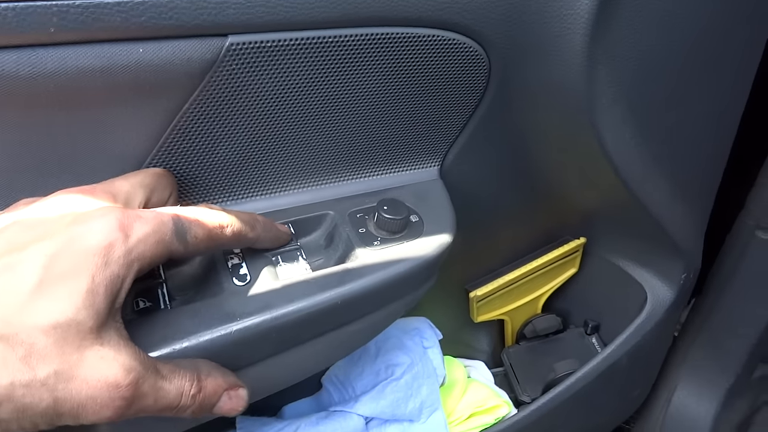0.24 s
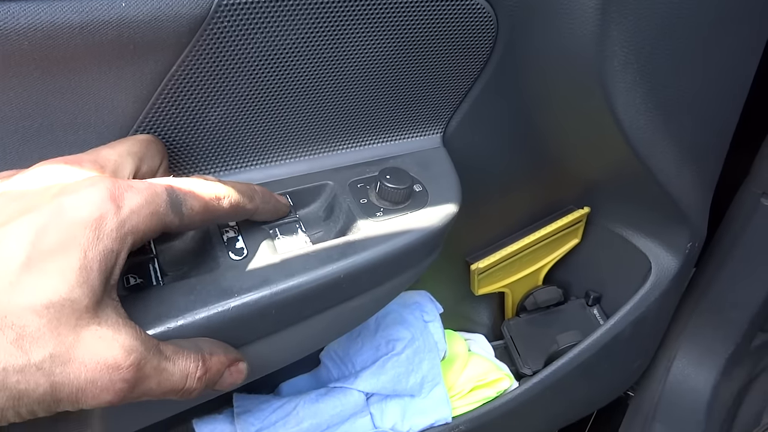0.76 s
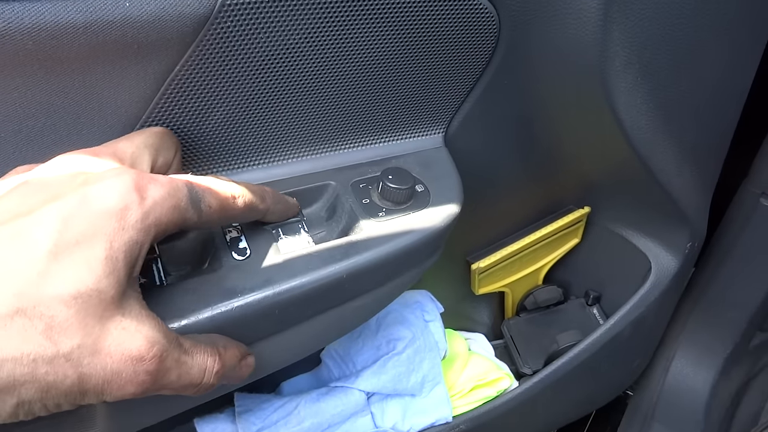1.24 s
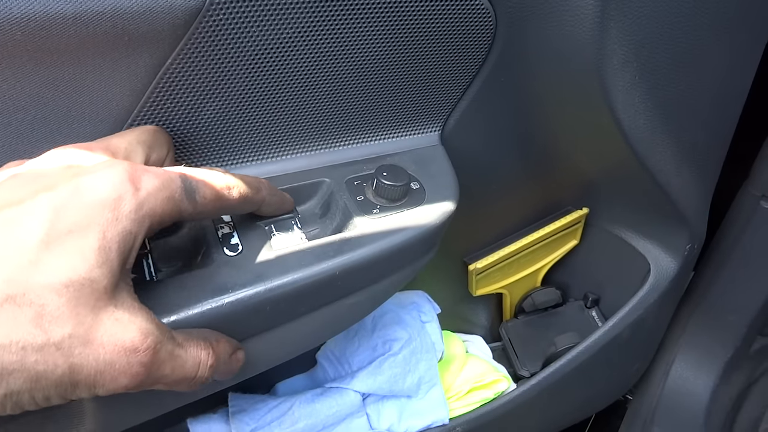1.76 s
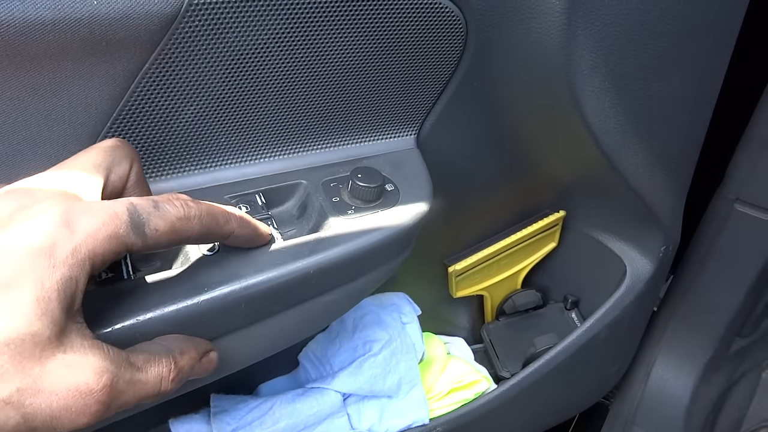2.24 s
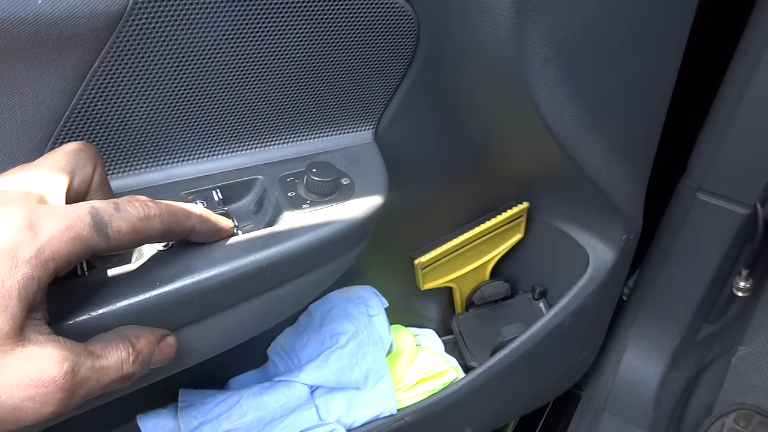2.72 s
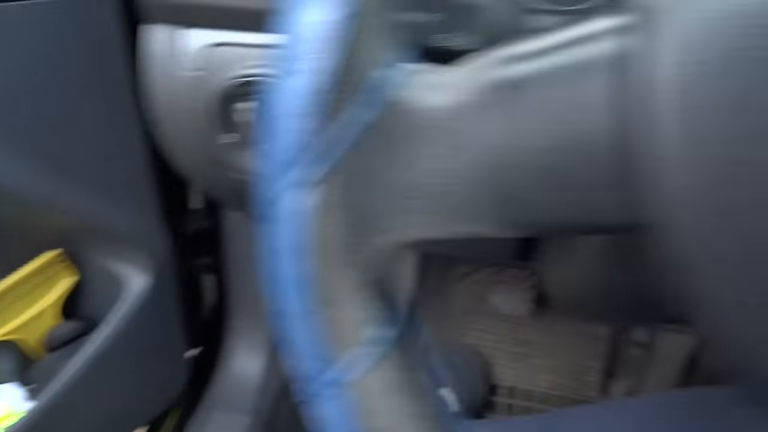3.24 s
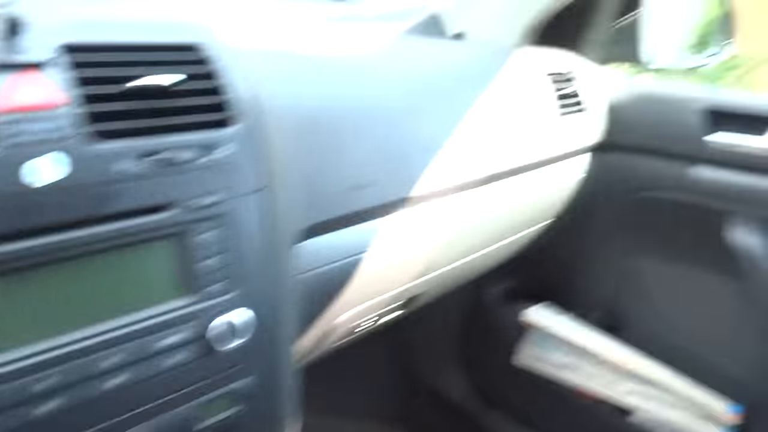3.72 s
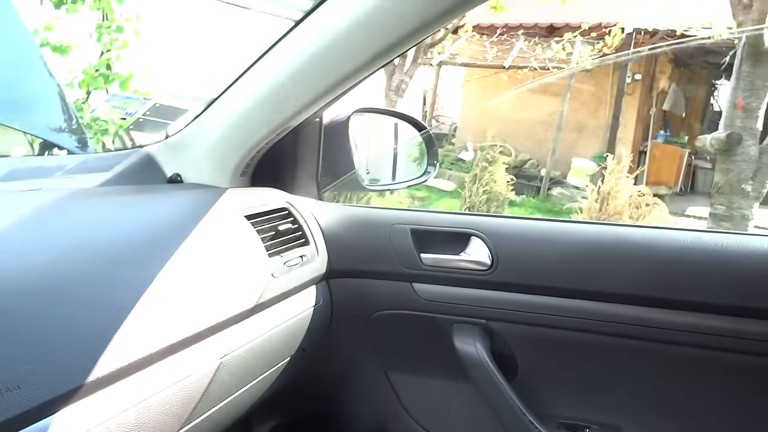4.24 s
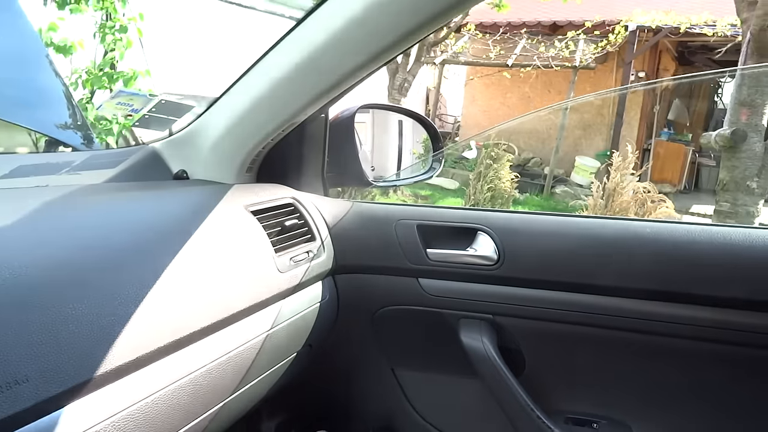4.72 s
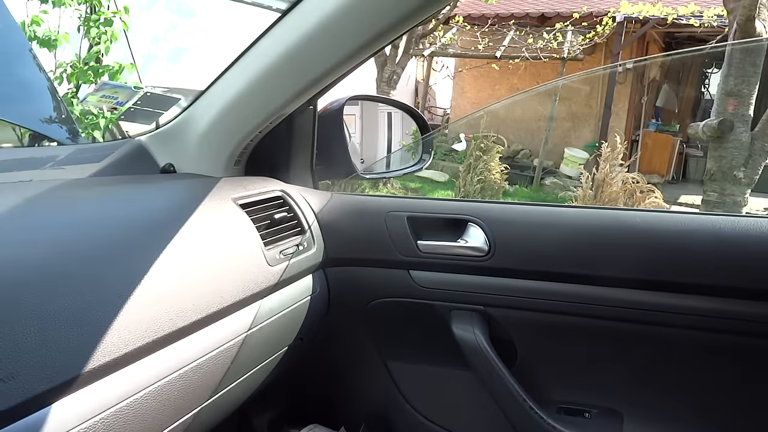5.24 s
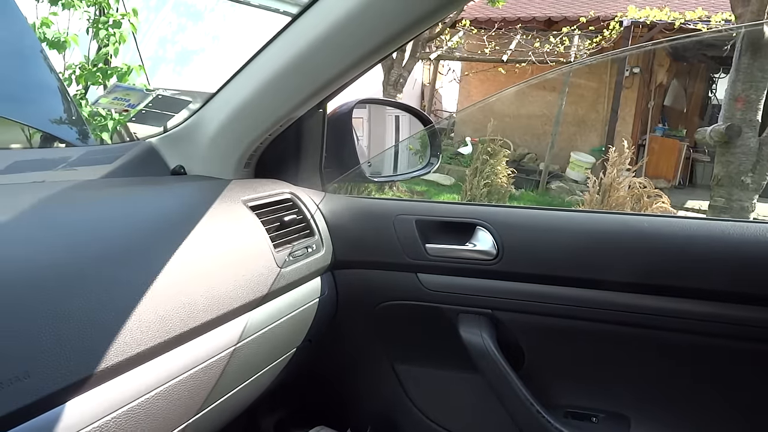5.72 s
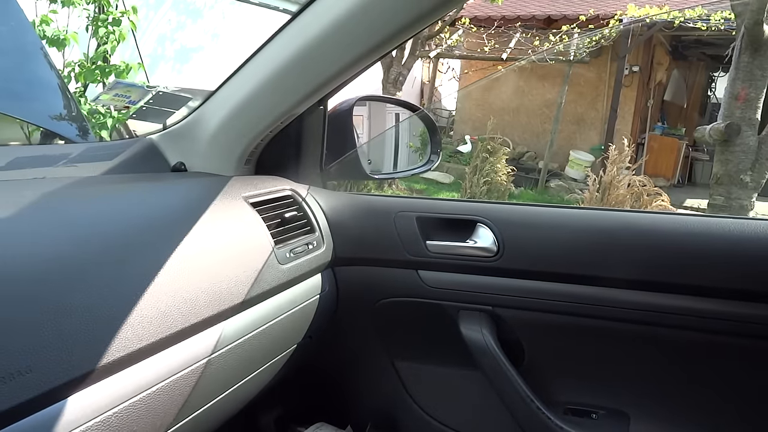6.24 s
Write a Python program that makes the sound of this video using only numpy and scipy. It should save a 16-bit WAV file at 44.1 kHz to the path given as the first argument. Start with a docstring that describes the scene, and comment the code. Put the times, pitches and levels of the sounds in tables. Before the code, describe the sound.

In a quiet parked car, plastic switches tick, a window motor hums for two seconds, clunks to a stop, then runs twice more briefly.

```python
"""Inside a small, quiet parked car a finger feels over the door switches, then runs the far power window: down, up, up.
Touches, clicks and knocks ring modes of the door, with noise bursts for the hard parts; skin hisses over plastic.
The motor sums multiples of its shaft speed, racing until the slack is taken up; its last run lasts to the end.
The glass rubs as uneven filtered noise with small catches and chirps, and slow rocking follows starts and stops.
Cabin air, low shudder and the hand on the trim lie beneath; two close microphone ports hear it all."""
import sys
import numpy as np
from scipy import signal
from scipy.fft import rfft, irfft, next_fast_len
from scipy.io import wavfile
from scipy.ndimage import uniform_filter1d, map_coordinates

SR = 44100
rng = np.random.default_rng(int(sys.argv[2]) if len(sys.argv) > 2 else 0)


def store_pcm(level_fs):
    """Save levels as 16-bit WAV."""
    pcm = np.round(np.clip(level_fs, -1, 1) * 32767).astype(np.int16)
    wavfile.write(sys.argv[1], SR, np.atleast_2d(pcm).T)


N = 285327
TIME = np.arange(N) / SR


def amp(db):
    """Decibels to gain."""
    return 10 ** (np.asarray(db) / 20)


def unit(x):
    """Scales to rms 1."""
    return x / np.sqrt(np.mean(x ** 2) + 1e-20)


def read(points, hz):
    """A spectrum table joined on a log-frequency axis."""
    table_hz, value = np.transpose(points)
    return np.interp(np.log(hz + 1), np.log(table_hz + 1), value)


def curves(rows, t):
    """Every column of a curve table at the times t."""
    knot_s, *columns = np.transpose(rows)
    return [np.interp(t, knot_s, column) for column in columns]


def add(mix, start_s, sound):
    """Mixes a sound in at start_s."""
    part = mix[max(round(start_s * SR), 0):][:len(sound)]
    part += sound[:len(part)]


def colour(x, points):
    """Filters by a spectrum table."""
    size = next_fast_len(len(x))
    gain = amp(read(points, np.fft.rfftfreq(size, 1 / SR)))
    return irfft(rfft(x, size) * gain, size)[:len(x)]


def noise(points, size):
    """Coloured noise of rms 1."""
    return unit(colour(rng.standard_normal(size), points))


def band(x, lo_hz, hi_hz):
    """The part of x between two frequencies."""
    edges_hz = [lo_hz, min(hi_hz, SR / 2 - 1)]
    return signal.sosfilt(signal.butter(3, edges_hz, "band", fs=SR, output="sos"), x)


def wander(knots_per_s, t):
    """Smooth random curve of rms near 1 through evenly spaced random knots."""
    knots = rng.standard_normal(int((t[-1] - t[0]) * knots_per_s) + 4)
    return map_coordinates(knots, [(t - t[0]) * knots_per_s + 1], order=3, mode="nearest")


def gate(t, fade_s):
    """Soft start and stop of a run; a run that lasts to the end stays on."""
    stop = t[-1] + (t[-1] > TIME[-1] - fade_s)
    return np.clip(np.minimum(t - t[0], stop - t) / fade_s, 0, 1)


def swell(u):
    """Rises to 1 at u = 1, then fades."""
    u = np.maximum(u, 0)
    return u * np.exp(1 - u)


def catching(size, grains_per_s, grain_size):
    """White noise with random single-sample catches that stand out from it."""
    catches = (rng.random(size) < grains_per_s / SR) * grain_size * rng.random(size)
    return rng.standard_normal(size) * (1 + catches)


def reflect(x, share=0.42, decay_s=0.005):
    """Echoes from nearby glass and trim ripple the spectrum."""
    t = np.arange(SR // 40) / SR
    echoes = rng.standard_normal(len(t)) * np.exp(-t / decay_s) * (t > .0004)
    return x + share * signal.fftconvolve(x, echoes / np.linalg.norm(echoes))[:len(x)]


# cabin air spectrum: hz [Hz], density_db [dB per Hz]
AIR_SPECTRUM = [(12, -58), (20, -10), (177, -0.5), (377, -7), (825, -8.5), (1000, -7.5), (1610, -14),
                (1760, -12.5), (5080, -23), (5850, -20.5), (14700, -29.5), (16000, -28.5)]
AIR_DB = -60


def cabin_air():
    """Steady coloured noise of the quiet cabin."""
    return amp(AIR_DB) * noise(AIR_SPECTRUM, N)


# low shudder spectrum: hz [Hz], density_db [dB per Hz]
SHUDDER_SPECTRUM = [(15,-4),(30,-9.5),(55,0),(90,-2.5),(150,-4.5),(300,-14),(900,-51)]
# swells of the shudder: start_s [s], level_db [dB], peak_s [s to the peak]
SHUDDERS = [(0.0, -66, .03), (1.0, -57.5, 0.095), (1.33, -73, .2), (1.89, -45.5, 0.039), (2.6, -38, 0.086),
            (2.8, -31, 0.033), (2.9, -50, 0.18), (3.38, -49, 0.15), (4.76, -46.5, 0.099), (5.22, -52, 0.11),
            (5.6, -42, 0.067), (6.04, -56, 0.12)]
SHUDDER_FLOOR_DB, SHUDDER_RUNNING_DB = -85, -58.5  # at rest; while the motor runs


def shudder():
    """Low noise of the shaken door and hand: a steady part and separate swells add in power."""
    running = sum((TIME > run[0]) & (TIME < run[2]) for run in RUNS)
    steady = amp(np.where(running, SHUDDER_RUNNING_DB, SHUDDER_FLOOR_DB))
    swells = sum((amp(level_db) * swell((TIME - start_s) / peak_s)) ** 2
                 for start_s, level_db, peak_s in SHUDDERS)
    return np.sqrt(steady ** 2 + swells) * noise(SHUDDER_SPECTRUM, N)


# spectra of the hand on trim, dull rub and bright rustle: hz [Hz], density_db [dB per Hz]
HAND_RUB_SPECTRUM = [(50,-10),(100,-3.5),(240,-2),(450,-17),(1000,-8),(3000,-51)]
HAND_RUSTLE_SPECTRUM = [(150, -13), (250, 8.5), (336, -23), (380, 3.5), (452, -11.5), (831, -6.5),
                        (2050, -10.5), (2360, -5), (4120, -19), (9830, -25), (16000, -28)]
# strokes of the hand: middle_s [s], half_s [s, to 1/e], rub_db [dB], rustle_db [dB]
STROKES = [(0.019, 0.044, -47, -49.5), (0.123, 0.074, -48.5, -57), (0.364, 0.13, -81, -61.5),
           (1.137, 0.1, -61, -64), (1.7, 0.058, -55, -80), (2.025, 0.11, -62.5, -70),
           (2.425, 0.06, -57, -65), (2.6, 0.03, -59, -55)]


def hand_on_trim():
    """Skin catches on grained trim: rub and rustle noise under unsteady bell-shaped strokes."""
    rustle = unit(reflect(colour(catching(N, grains_per_s=300, grain_size=5), HAND_RUSTLE_SPECTRUM)))
    rub = noise(HAND_RUB_SPECTRUM, N)
    hand = np.zeros(N)
    for middle_s, half_s, rub_db, rustle_db in STROKES:
        stroke = np.exp(-((TIME - middle_s) / half_s) ** 2)
        hand += stroke * (amp(rub_db) * rub + amp(rustle_db) * rustle)
    return hand * np.exp(0.35 * wander(44, TIME))


# skids of a fingertip: start_s [s], level_db [dB], peak_s [s to the peak]
SKIDS = [(.012,-51,0.0095),(1.924,-55,0.041)]
# resonances of a skid: centre_hz [Hz], width_hz [Hz], level_db [dB, relative]
SKID_RING = [(2270,240,3.5),(3080,290,-0.5),(5700,1300,-3),(9420,1200,4),(15000,900,-8)]


def skid(start_s, level_db, peak_s):
    """Skin hisses over plastic in a few bright resonances, swelling and fading."""
    t = np.arange(SR // 3) / SR
    ring = 0
    for hz, width_hz, ring_db in SKID_RING:
        resonance = band(rng.standard_normal(len(t)), hz - width_hz / 2, hz + width_hz / 2)
        ring = ring + amp(ring_db) * unit(resonance)
    return start_s, amp(level_db) * unit(ring) * swell(t / peak_s)


# modes of the door: hz [Hz], level_db [dB, relative], t60_s [s]
DOOR_MODES = [(82.3,-8,0.3),(120.7,-2,0.26),(147.3,3.5,0.12),(181.3,3,0.079),(224.3,3.5,0.11),(283.4,4,0.072),(351.2,-1,0.11),(399,-1,0.08),(484,2,0.046),(598,5,0.043),(660.4,3.5,0.052),(715,-2.5,0.034),(769,-3,0.063),(890,7.5,0.022),(1125,-2.5,0.065)]
# spectra of hard plastic and steel parts: hz [Hz], density_db [dB per Hz]
CLACK_SPECTRUM = [(400,-28),(900,0),(1400,6),(2100,1.5),(2900,-6),(3800,-7.5),(5500,-18),(9000,-58)]
TICK_SPECTRUM = [(2000,-10),(4000,-0.5),(6200,5.5),(7800,-1),(10000,3),(13000,-6),(16000,-12)]


def blow(row, rise_s, trim_db, rattle, tail_db, tail_s, focus_octaves=0.69):
    """A push and a brief rattle ring the door modes, while the hard parts clack and tick."""
    start_s, ring_db, ring_hz, thud_db, clack_db, tick_db, length_s = row
    t = np.arange(SR // 4) / SR
    decay = np.exp(-t / max(length_s, .001)) + amp(tail_db) * np.exp(-t / tail_s)
    contact = (1 - np.exp(-t / rise_s)) * decay
    chatter = contact * rng.standard_normal(len(t))
    force = rattle * chatter / np.linalg.norm(chatter) + (t == 0)

    hz, mode_db, t60_s = np.transpose(DOOR_MODES)[:, :, None]
    modes = amp(mode_db - 60 * t / t60_s) * np.sin(2 * np.pi * hz * t) * rng.choice([-1, 1], hz.shape)
    near = 1 / (1 + (np.log2(hz / ring_hz) / focus_octaves) ** 2)  # the spot that is hit favours some modes
    panel = signal.fftconvolve(force, (modes * near * (hz > 260)).sum(0))[:len(t)]
    panel *= 1 - np.exp(-t / 0.0018)
    shell = signal.fftconvolve(force, (modes * (hz < 260)).sum(0))[:len(t)]
    shell *= 1 - np.exp(-t / 0.0092)
    clack = reflect(contact * noise(CLACK_SPECTRUM, len(t)))
    tick = reflect(contact * noise(TICK_SPECTRUM, len(t)))

    out = np.zeros(len(t))
    levels_db = [ring_db, thud_db, clack_db, tick_db]
    for level_db, part_trim_db, part in zip(levels_db, trim_db, [panel, shell, clack, tick]):
        loudest = np.sqrt(uniform_filter1d(part ** 2, size=512, mode="constant").max())
        out += amp(level_db + part_trim_db) * part / loudest
    return start_s, out


# soft finger touches, levels before trim_db: start_s [s], ring_db [dB], ring_hz [Hz, centre],
# thud_db [dB], clack_db [dB], length_s [s]
TOUCHES = [(0.892, -38.5, 270, -52, -62, .007), (0.932, -44, 281, -46, -55.5, 0.0066),
           (1.127, -42, 700, -53, -49, 0.0038), (1.156, -54, 500, -54, -53.5, .004),
           (1.327, -49, 288, -52, -52.5, 0.018), (1.374, -39.5, 283, -47.5, -52, 0.025),
           (1.4, -36.5, 653, -42.5, -47, 0.0048), (1.417, -38.5, 804, -42.5, -55, 0.0046),
           (1.673, -34.5, 280, -32.5, -41.5, 0.0063), (1.738, -38, 620, -44, -46.5, 0.0031),
           (1.884, -38.5, 280, -42.5, -60, 0.0071), (1.906, -43, 864, -50, -48, 0.013),
           (1.928, -28, 755, -43.5, -41.5, .0045), (2.36, -45, 250, -43, -59, 0.0082),
           (2.491, -42, 385, -41, -47, 0.0076), (2.551, -46, 480, -36.5, -45, .0028),
           (4.98, -28, 316, -36.5, -40, 0.0025), (5.915, -37.5, 283, -46, -46.5, 0.0086),
           (5.943, -29.5, 385, -51, -38, 0.0074), (5.996, -35.5, 388, -51, -52.5, 0.0049)]
TOUCH_TICK_DB = -22  # tick against clack, before trim_db


def finger_touches(mix):
    """Soft blows of a fingertip on the switch panel."""
    for start_s, ring_db, ring_hz, thud_db, clack_db, length_s in TOUCHES:
        row = start_s, ring_db, ring_hz, thud_db, clack_db, clack_db + TOUCH_TICK_DB, length_s
        add(mix, *blow(row, rise_s=0.0021, trim_db=(-8, -2, -4, 3.5), rattle=0.51, tail_db=-22.5, tail_s=0.04))


# sharp switch clicks, levels before trim_db: start_s [s], ring_db [dB], ring_hz [Hz, centre],
# thud_db [dB], clack_db [dB], tick_db [dB], length_s [s]
CLICKS = [(0.13, -21, 1100, -43.5, -27, -47, 0.0018), (1.03, -40, 369, -40.5, -46, -45, 0.0028),
          (1.05, -55, 283, -49, -44.5, -56, 0.0018), (1.639, -32.5, 283, -44, -46, -52, 0.013),
          (2.393, -52, 1100, -63, -26, -39, 0.0021), (2.452, -37.5, 283, -45, -32.5, -53, 0.0012),
          (2.532, -56, 310, -58, -41, -38, 0.0013), (4.963, -32.5, 745, -43, -38.5, -48, 0.017),
          (5.003, -18, 316, -40, -27, -44.5, 0.0045), (5.93, -28.5, 394, -37.5, -40.5, -48.5, 0.01)]


def switch_clicks(mix):
    """Sharp blows of the switches on their panel."""
    for row in CLICKS:
        add(mix, *blow(row, rise_s=0.002, trim_db=(-13, -3.5, -8, -2.7), rattle=0.57, tail_db=-36, tail_s=0.017))


# knocks of the lifter and the glass, levels before trim_db: start_s [s], ring_db [dB],
# ring_hz [Hz, centre], thud_db [dB], clack_db [dB], tick_db [dB], length_s [s]
KNOCKS = [(2.604, -22, 640, -32.5, -35, -51, 0.0078), (2.634, -19.5, 380, -27.5, -39, -62, 0.0055),
          (2.647, -15.5, 372, -30.5, -37.5, -53, 0.008), (2.68, -29, 450, -36, -45, -53, 0.007),
          (2.709, -8, 646, -21, -41, -60, 0.0036), (2.815, -31, 284, -29, -31.5, -39.5, 0.0061),
          (2.829, -27, 514, -32, -57, -56, 0.007), (2.868, -39, 280, -37, -56, -73, 0.014),
          (2.922, -23, 930, -39, -40, -54, 0.0027), (2.995, -21.5, 406, -31, -32, -44, 0.0033),
          (3.242, -30.5, 310, -40, -48, -70, 0.0094), (4.626, -20.5, 290, -54, -53, -53, 0.0066),
          (4.653, -20, 497.5, -37, -54, -42, 0.0099), (4.772, -19.5, 302, -24.5, -50, -55, 0.012),
          (4.79, -24, 367, -30, -44.5, -44.5, 0.0054), (5.068, -42, 500, -46, -54, -50, 0.004),
          (5.076, -23, 330, -32.5, -43.5, -64, 0.0061), (5.128, -22, 333, -43, -39.5, -67, 0.0085),
          (5.14, -5.5, 554, -30, -44, -58, 0.023), (5.186, -8.5, 430, -26, -35, -64, 0.0069),
          (5.198, -10, 467, -26.5, -38, -53, 0.01), (5.489, -25, 453, -42, -46, -60, 0.01),
          (5.529, -26, 501, -42, -41, -37.5, 0.0047), (5.606, -21, 280, -22, -46, -62, 0.011),
          (6.028, -32, 636, -36, -49, -49, 0.0035), (6.042, -19.5, 566, -32, -42.5, -66, 0.0093)]


def door_knocks(mix):
    """Blows of the lifter and the glass inside the far door."""
    for row in KNOCKS:
        add(mix, *blow(row, rise_s=0.0016, trim_db=(-12, -3.5, 0, -5), rattle=0.34, tail_db=-19.5, tail_s=0.041))


# rocking when the glass starts or stops: start_s [s], level_db [dB, peak]
JOLTS = [(2.801, -41), (4.79, -55), (5.215, -40), (5.62, -44), (6.06, -42)]
ROCK_HZ, ROCK_PEAK_S = 30.9, 0.058


def jolt(start_s, level_db):
    """The car rocks on its springs for a few slow cycles."""
    t = np.arange(SR // 2) / SR
    return start_s, amp(level_db) * swell(t / ROCK_PEAK_S) * np.sin(2 * np.pi * ROCK_HZ * t)


# chirps of the catching seal: start_s [s], level_db [dB], pitch_hz [Hz], peak_s [s to the peak]
CHIRPS = [(3.885,-45,1099,0.013),(4.27,-58,3805,0.011),(4.301,-36,3900,0.002),(4.443,-42,4160,0.0053),(4.697,-42.5,4600,0.0065),(4.718,-44.5,3940,0.011),(5.495,-46,1980,0.021),(6.157,-39,3980,0.0025),(6.192,-51,6000,0.005)]


def chirp(start_s, level_db, pitch_hz, peak_s, half_width=0.065):
    """A brief stick and slip of the seal, narrow in pitch."""
    t = np.arange(SR // 6) / SR
    squeak = band(rng.standard_normal(len(t)), pitch_hz * (1 - half_width), pitch_hz * (1 + half_width))
    return start_s, amp(level_db) * unit(squeak) * swell(t / peak_s)


TURN_S = (3.6, 3.96)  # the microphone comes round to face the far door
AWAY_DB = {"hum": -2, "rub": -5, "hiss": -10, "drone": -4.5}  # change while it still faces away
# change while the glass is not yet moving
SLACK_DB = {"hum": -4.5, "whine": -4, "high tone": -14, "rub": -8, "hiss": -11.5, "drone": 5}


def away(t):
    """1 while the microphone faces the near door, 0 once it faces the far one."""
    return np.interp(t, TURN_S, [1, 0])


def slack(t, taken_up_s, ease_s):
    """1 while the lifter runs loose, 0 once it carries the glass."""
    return .5 - .5 * np.tanh((t - taken_up_s) / (2 * ease_s))


def patchy(x, depth_db=1.83):
    """The contact shifts from spot to spot, so narrow bands swell and fade."""
    z = signal.stft(x, nperseg=512)[2]
    patches = uniform_filter1d(rng.standard_normal(z.shape), size=5, axis=0)
    patches = uniform_filter1d(patches, size=6, axis=1)
    return signal.istft(z * amp(depth_db * unit(patches)), nperseg=512)[1][:len(x)]


# friction spectra of the glass going down and up: hz [Hz], density_db [dB per Hz]
SLIDE_DOWN = [(47, -44), (80, -26), (117, -21), (222, -23.5), (323, -26), (563, -19.5), (672, -21),
              (1250, -12.5), (1370, -16), (1490, -8), (1600, -11), (3240, -16), (7700, -29.5), (11000, -29),
              (16000, -40.5)]
SLIDE_UP = [(47, -34), (80, -1), (139, -7.5), (277, -5), (378, -6.5), (538, -4), (629, -5.5), (958, -17),
            (1250, -16.5), (1340, -10), (1460, -11), (2900, -16.5), (3790, -13), (11200, -19),
            (16000, -30.5)]
GRIP_S = 0.0045  # the glass breaks free of its seals almost at once


def slide(run, spectrum, grit=0.083):
    """Rubber rubs on glass: uneven friction noise with small catches, droning in the door below."""
    start_s, taken_up_s, stop_s, *_, rub_db, hiss_db, drone_db = run
    t = np.arange(start_s, stop_s, 1 / SR)
    loose = slack(t, taken_up_s, GRIP_S)
    rough = catching(len(t), grains_per_s=420, grain_size=4.3) * np.exp(grit * wander(130, t))
    friction = colour(patchy(rough), spectrum)
    # drone_db is the level within 250-570 Hz, rub_db within 2000-3500 Hz
    drone = band(friction, 128, 775) / np.std(band(friction, 250, 570))
    friction = reflect(friction)
    rub = band(friction, 650, 3640) / np.std(band(friction, 2000, 3500))
    hiss = unit(band(friction, 5270, SR / 2))
    out = 0
    for name, level_db, layer in [("drone", drone_db, drone), ("rub", rub_db, rub), ("hiss", hiss_db, hiss)]:
        out = out + amp(level_db + SLACK_DB[name] * loose + AWAY_DB[name] * away(t)) * layer
    return start_s, out * gate(t, 0.003)


# single tones change as the microphone moves about the cabin:
# middle_s [s], multiple [of shaft speed], change_db [dB], half_s [s, to 1/e]
SWELLS = [(3.25, 1, -6, .3), (3.5, 10, 23, .07), (3.5, 17, 16, .07), (3.535, 20, -10, .028),
          (3.62, 30, 7, .12), (3.7, 20, -6, .025), (4.24, 12, 9, .07), (4.5, 9, 8, .2)]
SLOTS = 10  # armature slots
FREE_HZ, SPIN_UP_S, TAKE_UP_S = 86.67, .021, 0.01635  # no-load speed; time constants of spin-up, loading
SPEED_POWER = 1.7  # how steeply the sound grows as the motor spins up
FLUTTER = .3  # hum flutter, approached by high multiples
BRUSH_HZ, BRUSH_HALF_WIDTH, BRUSH_DB = 7090, .05, -64.99  # half width as a share of the pitch


def motor(run, load, hum, jitter=0.002, loose_jitter=0.0223, whine_flutter=0.024, loose_flutter=0.5, throb=0.024):
    """Tones on multiples of shaft speed, slot tones throbbing once a turn, faint brush noise; races if unloaded."""
    start_s, taken_up_s, stop_s, hum_db, low_db, high_db = run[:6]
    t = np.arange(start_s, stop_s, 1 / SR)
    loose = slack(t, taken_up_s, TAKE_UP_S)
    loaded_hz, whine_db = curves(load, t)
    spun_up = 1 - np.exp(-(t - start_s) / SPIN_UP_S)
    shaft_hz = (loaded_hz + (FREE_HZ - loaded_hz) * loose) * spun_up
    uneven = 1 + (jitter + loose_jitter * loose) * wander(46.13, t)
    angle = 2 * np.pi * np.cumsum(shaft_hz * uneven) / SR
    turned_db = AWAY_DB["hum"] * away(t)

    def tone(k, rms_db):
        """Multiple k of the shaft speed, as it reaches the moving microphone."""
        swell_db = sum(change_db * np.exp(-((t - middle_s) / half_s) ** 2)
                       for middle_s, multiple, change_db, half_s in SWELLS if multiple == k)
        return np.sqrt(2) * amp(rms_db + swell_db) * np.cos(k * angle + 2 * np.pi * rng.random())

    hum_db = hum_db + turned_db + SLACK_DB["hum"] * loose
    out = 0
    for multiple, relative_db in hum:
        flutter = 1 + FLUTTER * multiple / (multiple + 2) * wander(31.76, t)
        out = out + tone(round(multiple), hum_db + relative_db) * flutter

    low_db = low_db + turned_db
    whine_db = whine_db + SLACK_DB["whine"] * loose
    high_db = high_db + turned_db + SLACK_DB["high tone"] * loose
    slots = sum(tone(k * SLOTS, level_db) for k, level_db in enumerate([low_db, whine_db, high_db], 1))
    flutter = 1 + (whine_flutter + loose_flutter * loose) * wander(59.47, t)
    out += slots * (1 + throb * np.cos(angle)) * flutter

    lo_hz, hi_hz = BRUSH_HZ * (1 - BRUSH_HALF_WIDTH), BRUSH_HZ * (1 + BRUSH_HALF_WIDTH)
    brushes = unit(band(rng.standard_normal(len(t)), lo_hz, hi_hz))
    out += amp(BRUSH_DB + AWAY_DB["hiss"] * away(t)) * brushes
    return start_s, out * spun_up ** SPEED_POWER * gate(t, 0.022)


# runs down, up and up again, levels before SLACK_DB and AWAY_DB: start_s [s], taken_up_s [s],
# stop_s [s], hum_db [dB], low_slot_db [dB], high_slot_db [dB], rub_db [dB], hiss_db [dB], drone_db [dB]
RUNS = [(2.597, 2.815, 4.776, -32.6, -59, -56.5, -46, -49.5, -49.5),
        (5.067, 5.211, 5.608, -43.5, -50.5, -64, -47, -52.5, -46.5),
        (6.023, 6.04, 6.47, -42.5, -42, -57, -49, -54.5, -51.5)]
# motor under load, a table a run: time_s [s], shaft_hz [Hz], whine_db [dB, before SLACK_DB]
DOWN_LOAD = [(2.9, 67.5, -42.5), (3.02, 70.02, -47.5), (3.28, 68.73, -47), (3.462, 70.06, -35.5),
             (3.6, 72.7, -37), (3.78, 74.5, -34), (4.24, 73.56, -35), (4.521, 74.48, -36.5),
             (4.76, 72.4, -34)]
UP_LOAD = [(5.23, 66.7, -40), (5.31, 64.8, -42), (5.43, 63.4, -41), (5.59, 64.2, -40)]
UP_AGAIN_LOAD = [(6.071, 61.1, -51), (6.125, 63.9, -48), (6.2, 61.9, -50.5), (6.3, 61.6, -51),
                 (6.47, 61.8, -47)]
# hum, a table a run: multiple [of shaft speed], relative_db [dB against the run's hum_db]
DOWN_HUM = [(1,-18.5),(2,-26.5),(3,-19.5),(4,-30.5),(5,-31),(7,-32.5),(8,-26.5),(9,-20.5),(11,-26),(12,-21),(14,-23.5),(15,-25),(17,-27.5),(19,-24.5),(22,-26.5),(23,-23.5)]
UP_HUM = [(1,-8.5),(2,-13.5),(3,-7),(4,-27),(5,-13),(6,-6),(7,-20),(8,-3.5),(9,-24),(11,-10),(12,-7.5),(21,-17),(23,-19),(25,-28)]
UP_AGAIN_HUM = [(1,-10),(2,-28),(3,-13),(4,-21),(5,-9),(6,-7),(7,-14),(8,-13),(9,-19),(12,-6.5),(14,-17),(17,-19.5),(23,-26),(25,-15),(27,-29)]


def window_runs(mix):
    """The motor drives the glass along its seals in each run."""
    loads = [DOWN_LOAD, UP_LOAD, UP_AGAIN_LOAD]
    hums = [DOWN_HUM, UP_HUM, UP_AGAIN_HUM]
    seals = [SLIDE_DOWN, SLIDE_UP, SLIDE_UP]
    for run, load, hum, spectrum in zip(RUNS, loads, hums, seals):
        add(mix, *motor(run, load, hum))
        add(mix, *slide(run, spectrum))


# difference between the ports: hz [Hz], side_db [dB against mid]
PORT_WIDTH = [(60,-36),(180,-32),(350,-26),(700,-23),(1400,-19),(2800,-13),(5600,-10),(10000,-14),(14000,-21)]


def ports(x, right_db):
    """Two close microphone ports: cabin reflections differ in the treble, which also leans to one side."""
    t = np.arange(SR // 25) / SR
    echoes = rng.standard_normal(len(t)) * np.exp(-t / .014) * (t > .002)
    side = colour(signal.fftconvolve(x, echoes / np.linalg.norm(echoes))[:N], PORT_WIDTH)
    treble = colour(x, [(150, -24), (700, -6), (1400, 0), (8000, 0), (14000, -12)])
    lean = treble * np.tanh(right_db * np.log(10) / 40)  # right over left is right_db where treble is 0 dB
    return np.array([x + side - lean, x - side + lean])


def scene():
    """The cabin, the near switch panel and the window in the far door."""
    near = cabin_air() + shudder() + hand_on_trim()
    for row in SKIDS:
        add(near, *skid(*row))
    finger_touches(near)
    switch_clicks(near)
    door = np.zeros(N)
    door_knocks(door)
    for row in JOLTS:
        add(door, *jolt(*row))
    for row in CHIRPS:
        add(door, *chirp(*row))
    window_runs(door)
    return ports(near, right_db=-.5) + ports(door, right_db=1.2 + 2 * away(TIME))


EDGE_HZ = 16000


def record(dry):
    """Band limit: a steep low-pass at EDGE_HZ."""
    lowpass = signal.firwin(511, EDGE_HZ, window=("kaiser", 9), fs=SR)
    return signal.oaconvolve(dry, lowpass[None], "same")


dry = scene()
out = record(dry)
store_pcm(out)
```